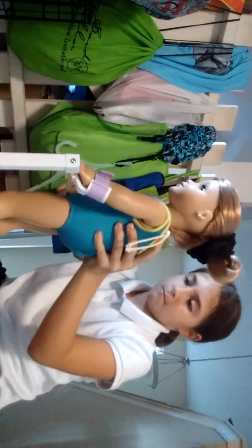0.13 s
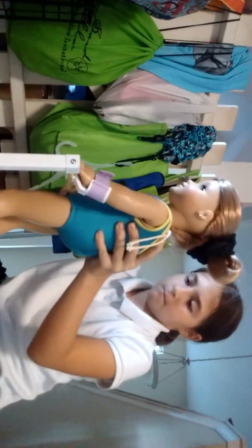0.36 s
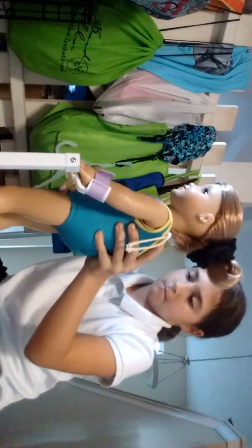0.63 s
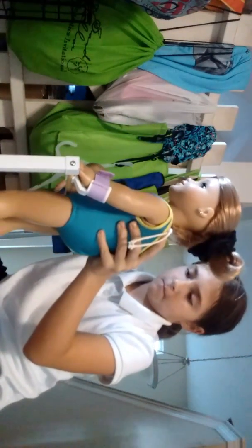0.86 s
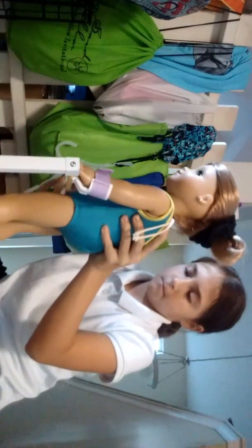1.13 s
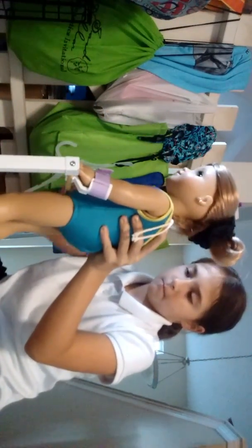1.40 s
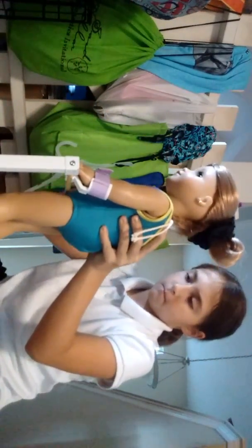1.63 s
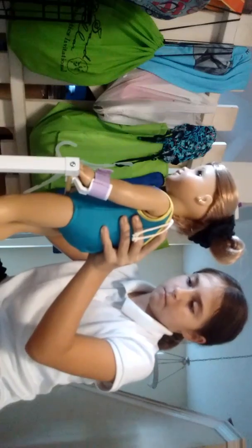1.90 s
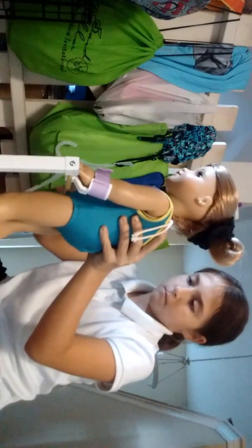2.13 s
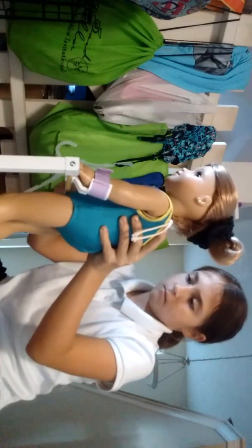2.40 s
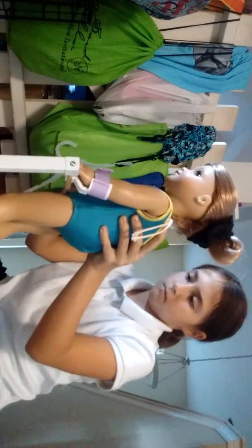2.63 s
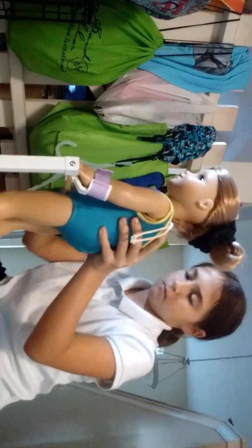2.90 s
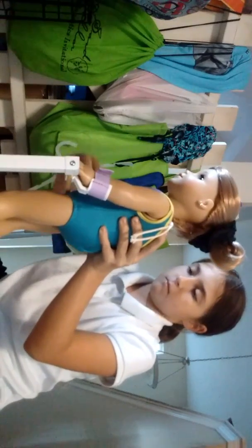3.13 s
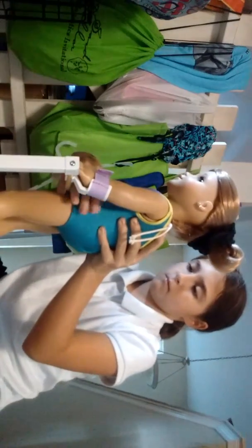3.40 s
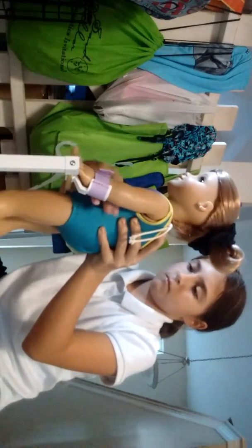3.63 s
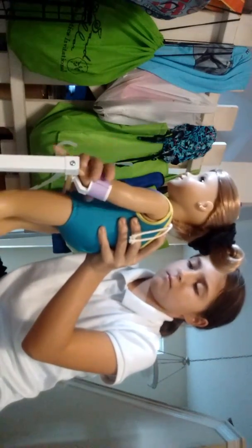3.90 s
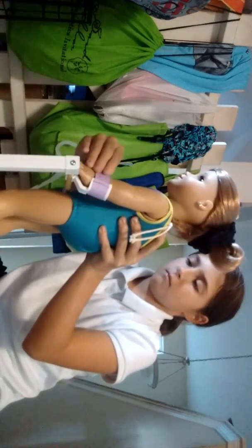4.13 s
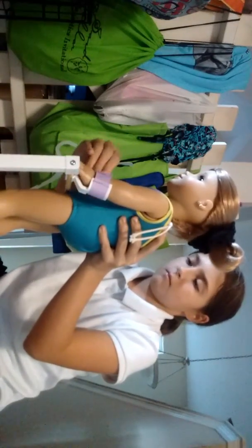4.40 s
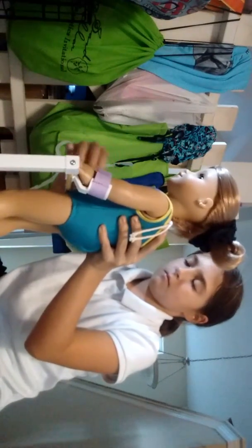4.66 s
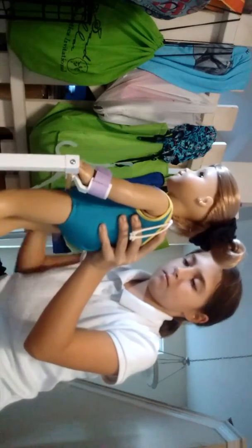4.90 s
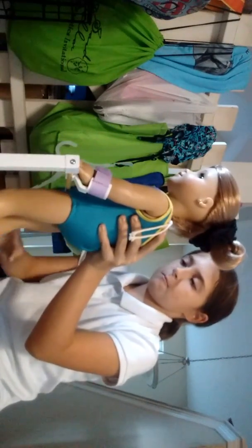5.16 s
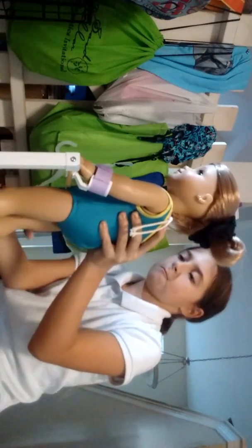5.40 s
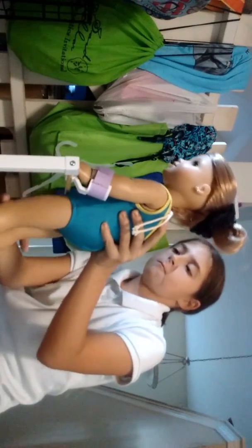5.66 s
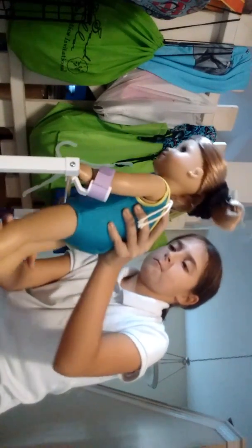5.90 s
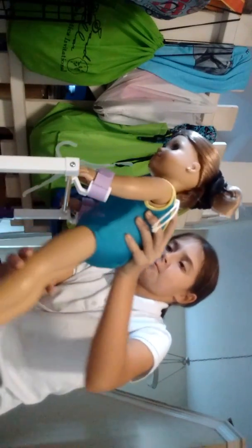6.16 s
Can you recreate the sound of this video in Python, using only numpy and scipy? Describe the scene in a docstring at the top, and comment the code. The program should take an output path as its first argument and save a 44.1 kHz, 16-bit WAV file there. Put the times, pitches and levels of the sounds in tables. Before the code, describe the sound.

A quiet small room with steady low ventilation hum, duct rumble and faint air hiss, miked close in stereo, the toy a little to the left. From 0.1 to 1.5 s, soft hollow plastic taps and faint brushing of hands on a toy bar, the firmest near 1.05 s, each with a faint ringing tail. At 1.8 s a wrist strap begins to crackle, loud and dense until about 2.0 s, thinning out to 2.25 s with one last strong snap. The background dips and slowly returns. Light taps follow, with firmer ones at 2.84 and 3.46 s. At 3.55 s crisp snaps lead to one very sharp, clean clasp click at 3.59 s, the loudest moment, then bright plastic crackles until 3.9 s. Near quiet until 4.8 s, then scattered soft rubs and hollow knocks, strongest around 5.7 s, ending by 5.95 s with only ventilation.

```python
"""A quiet room with ventilation: a small doll is fitted to plastic toy bars.
Wrist straps crackle, hands tap and rub the bar: mostly sharp blows and noise bursts through resonances;
taps add two ringing tones, the clasp one clean click. Hum lines and shaped noise make the ventilation;
room answer and ventilation sag at set moments and creep back.
Two microphone ports are cross-fed with a short delay, the right side inverted."""
import sys
import numpy as np
from scipy import signal
from scipy.fft import rfft, irfft, next_fast_len
from scipy.io import wavfile
from scipy.ndimage import uniform_filter1d

SR = 44100
rng = np.random.default_rng(int(sys.argv[2]) if len(sys.argv) > 2 else 0)


def linear_from_db(decibels):
    """Turn decibels (scalar or array-like) into linear amplitude factors; 0 gives 1."""
    return 10 ** (np.asarray(decibels, float) / 20)


def dump(signal):
    """Clip the signal to [-1, 1] and save it as 16-bit WAV at the path in sys.argv[1]."""
    limited = np.clip(np.atleast_2d(signal).T, -1, 1)
    pcm = np.round(limited * 32767).astype(np.int16)
    wavfile.write(sys.argv[1], SR, pcm)


N = 276948

# ventilation hum lines: f/Hz, level/dB
HUM_LINES = [(50.7, -51), (58.3, -39.5), (82.6, -54.5), (120, -50)]
# duct rumble spectrum, relative: f/Hz, level/dB per hertz
RUMBLE_SPECTRUM = [(15, -48), (28, -6), (45, -13.5), (66, -10), (92, -6.5), (118, -2.5), (135, -5.5),
                   (180, 4), (205, -6), (232, 0.5), (262, -8.5), (305, -11.5), (340, -12.5), (440, -16),
                   (490, -10), (545, -18.5), (610, -17.5), (750, -25), (1000, -55), (1600, -120)]
# air hiss spectrum, relative: f/Hz, level/dB per hertz
AIR_SPECTRUM = [(300, -120), (500, 0.5), (800, 0), (1150, 0.5), (1700, -7.5), (2400, -8.5), (3400, -10.5),
                (5000, -18.5), (6500, -22), (10000, -17), (15400, -19), (15900, -66)]
# likeness of the ventilation noise at the two ports: f/Hz, likeness (1 = identical)
PORT_LIKENESS = [(100, 1), (350, 0.69), (600, 0.63), (1200, 0), (2500, 0), (10000, 0)]
# sags of room answer and ventilation: t/s, depth/dB
SAGS = [(1.96, 1), (2.002, 6), (2.2, 4.5), (3.593, 15.5), (3.905, 13.5)]
# decay of the room's answer: f/Hz, t60/s
WALL_DECAY = [(500, 0.14), (3000, 0.58), (12000, 0.17)]
# toy's direct sound at the far port: f/Hz, level/dB
FAR_PORT_LEVEL = [(500, -27.5), (1000, -4), (2500, -4.5), (5000, -9.5), (8000, -1), (14000, -20)]
# scattered share at the far port: f/Hz, level/dB
SCATTER_LEVEL = [(500, -21), (1500, -3), (4000, -3.5), (10000, -5.5)]
# share each side takes from the other port: f/Hz, level/dB
CROSS_LEVEL = [(200, -3), (2000, -5.5), (8000, 2), (15000, -16.5)]
# rubbing strokes: start t/s, length/s, force level/dB, low body level/dB, high body level/dB
RUB_STROKES = [(0.345, 0.086, -47, 5.5, 3), (0.511, 0.062, -50.5, 10, -3), (1.846, 0.27, -48, 3.5, 11.5),
               (2.141, 0.045, -30.5, -1, -0.5), (2.175, 0.064, -26.5, 3.5, 7), (2.99, .05, -47, -1, -2.5),
               (3.193, 0.069, -44.5, -2.5, 2.5), (3.352, 0.043, -51.5, -3.5, 4.5),
               (3.457, 0.042, -48, -2, 4), (3.655, 0.08, -36, -7, -7.5), (3.808, 0.063, -48.5, 2, 8.5),
               (4.809, 0.052, -49.5, 5.5, -1), (5.106, 0.033, -44, 1, -4), (5.293, 0.044, -52, -9, -6.5),
               (5.684, 0.069, -47, 2, -5), (5.801, 0.091, -47, 4, -1)]
# rubbed strap cloth, low resonances: f/Hz, width/Hz, level/dB
CLOTH_MODES = [(1233, 310, 4.5), (2400, 1140, -1)]
# hand taps on the bar: t/s, force level/dB, hollow knock level/dB
BAR_TAPS = [(0.0832, -28.5, 13), (0.1996, -29, -2), (0.2025, -29, 8), (0.3535, -36, -8), (0.3905, -30, 8),
            (0.4099, -33, 10), (0.5142, -31, 2.5), (0.547, -30.5, 9), (0.654, -32, 3), (1.011, -33, -5),
            (1.053, -23, 4.5), (1.062, -30, 13.5), (1.2106, -32, 7.5), (1.507, -32.5, 5), (1.538, -31, 3.5),
            (2.358, -35, -15), (2.411, -30.5, -14), (2.8055, -34.5, 11.5), (2.838, -21, 1.5),
            (3.039, -32.5, -12), (3.308, -28.5, -14), (3.457, -19, 1), (4.0687, -41.5, -10),
            (4.138, -40.5, -11), (4.8109, -34.5, 7), (5.1172, -33, 5), (5.2121, -28.5, 10),
            (5.2803, -28.5, 12.5), (5.5276, -25.5, -0.5), (5.534, -29, 4), (5.5424, -28, 5.5),
            (5.6964, -25.5, -11), (5.704, -17.5, 3.5), (5.8071, -30, 4), (5.822, -22.5, 2.5),
            (5.8804, -26, 2), (5.8944, -34, -6), (5.926, -39, 0)]
# hollow knock of the bar: f/Hz, width/Hz, level/dB
KNOCK_MODES = [(864, 430, 2), (2060, 1220, -4)]
# the bar's wall, under taps and rubs: f/Hz, width/Hz, level/dB
SHELL_MODES = [(4390, 1370, 0.5)]
# the bar's long ring, a beating pair: f/Hz, t60/s
BAR_RING = [(2480, .33), (2535, .28)]
# strap snaps: t/s, force level/dB, brightness level/dB
STRAP_SNAPS = [(1.022, -25, -4.5), (1.812, -32.5, -4), (1.8316, -22.5, -5), (1.842, -12, -5),
               (1.8463, -2.5, -10.5), (1.8598, -6, -3), (1.8964, -7.5, -8.5), (1.926, -8, -2),
               (1.935, -19, 1), (1.9623, -2, -7), (1.9731, -3, -8), (1.978, -2.5, -5.5), (1.9943, -3.5, -5),
               (2.0033, -5, -4), (2.0347, -11, -4.5), (2.0505, -21, -1), (2.056, -19, -10),
               (2.0868, -17.5, -5.5), (2.1048, -16.5, -4.5), (2.1275, -28, 6), (2.1364, -12.5, -7),
               (2.1428, -11, -10.5), (2.1547, -15, 0), (2.165, -19, 4), (2.182, -16.5, -0.5),
               (2.2134, -7, -7.5), (2.2244, -24, 5), (3.547, -19, 8.5), (3.5537, -16.5, 3),
               (3.5588, -12.5, 3.5), (3.5894, -31, -9), (3.6436, -24.5, -3), (3.6571, -8.5, 3),
               (3.6591, -15, 6), (3.6644, -11, 0.5), (3.6776, -12, 3.5), (3.69, -20.5, 5),
               (3.695, -20.5, 2), (3.702, -17.5, 0), (3.717, -24, 12), (3.7506, -24, 7.5),
               (3.776, -22, 8.5), (3.7952, -23.5, 7), (3.8106, -27, 12.5), (3.8166, -16.5, 5),
               (3.8297, -24.5, 11.5), (3.8394, -27, 9), (3.8736, -12.5, 3.5), (3.905, -11, 1),
               (3.913, -14, -0.5)]
# how the strap is held from each moment on: start t/s, low body level/dB, spray t60/s
STRAP_GRIPS = [(0, -5, .008), (1.8, -17, 0.033), (2.08, -8.5, 0.025), (3.5, -5.5, 0.012)]
# the clasp clicking shut, a single row: t/s, force level/dB, low body level/dB, brightness level/dB
CLASP_CLICK = (3.5922, 14, -8, 2.5)
# plastic body under the strap, low group: f/Hz, width/Hz, level/dB
LOW_MODES = [(1380, 1200, -3), (2510, 1440, -1)]
# plastic body under the strap, middle group: f/Hz, width/Hz, level/dB
MIDDLE_MODES = [(4356, 295, 0)]
# plastic body, high group, shared by straps, taps and rubs: f/Hz, width/Hz, level/dB
HIGH_MODES = [(6350, 740, -3.5), (8680, 2760, -4.5), (9920, 1940, -2), (12740, 3600, -11.5)]
COLOUR_SCATTER_DB = 2.5  # no two snaps or taps excite the body alike


def unit(x):
    """Scales to rms 1."""
    return x / np.sqrt(np.mean(x ** 2) + 1e-20)


def along(points, hz):
    """Reads a curve of (Hz, value) points on a log frequency axis."""
    f, value = np.transpose(points)
    return np.interp(np.log(hz + 1), np.log(f + 1), value)


def filtered(x, response):
    """Applies a complex response of frequency."""
    size = next_fast_len(N + SR // 2)
    return irfft(rfft(x, size) * response(np.fft.rfftfreq(size, 1 / SR)), size)[..., :N]


def late(hz, ms):
    """Response of a pure delay: phase falls in proportion to frequency."""
    return np.exp(-2j * np.pi * hz * ms / 1000)


def pair(spectrum):
    """Noise of rms 1 at two ports: long waves reach both alike, short ones do not."""
    def mid_side(hz):
        angle = np.arccos(np.clip(along(PORT_LIKENESS, hz), -1, 1)) / 2
        return linear_from_db(along(spectrum, hz)) * np.array([np.cos(angle), np.sin(angle)])
    mid, side = filtered(rng.standard_normal((2, N)), mid_side)
    return unit(np.array([mid + side, mid - side]))


def ventilation():
    """Steady hum lines as sines, duct rumble and air hiss as shaped noise."""
    t = np.arange(N) / SR
    hum = np.zeros(N)
    for hz, db in HUM_LINES:
        hum += linear_from_db(db) * np.sqrt(2) * np.sin(2 * np.pi * (hz * t + rng.random()))
    rumble = linear_from_db(-41.5) * pair(RUMBLE_SPECTRUM)
    air = linear_from_db(-54) * pair(AIR_SPECTRUM)
    return hum + rumble + air


def sag():
    """The level drops at once at each listed moment and returns at a steady pace; the deepest sag wins."""
    t, back_db_per_s = np.arange(N) / SR, 10.5
    sags = [np.where(t > s, db - back_db_per_s * (t - s), 0).clip(0) for s, db in SAGS]
    return linear_from_db(-uniform_filter1d(np.max(sags, axis=0), size=300))


def walls(x):
    """The room's answer: decaying noise, unrelated at the two ports, renewed every tenth of a second."""
    out, step = np.zeros((2, N + SR)), SR // 10
    for start in range(0, N, step):
        hz, t, grains = signal.stft(rng.standard_normal((2, SR // 3)), SR, nperseg=256)
        fade = linear_from_db(-60 * t / along(WALL_DECAY, hz)[:, None])
        tail = signal.istft(grains * fade, SR, nperseg=256)[1]
        tail = tail / np.linalg.norm(tail[0])
        wet = signal.fftconvolve(x[None, start:start + step], tail, axes=1)
        out[:, start + 130:][:, :wet.shape[1]] += wet  # about 3 ms behind the toy
    return out[:, :N]


def scattered(x, t60):
    """Sound bounced off moving hands and doll: a brief smear, renewed every fiftieth of a second."""
    step = SR // 50
    out, t = np.zeros(N + SR), np.arange(step) / SR
    for start in range(0, N, step):
        smear = rng.standard_normal(step) * linear_from_db(-60 * t / t60)
        piece = np.resize(x[start:start + step], step)
        out[start:][:2 * step - 1] += signal.fftconvolve(piece, smear / np.linalg.norm(smear))
    return out[:N]


def resonant(x, modes):
    """Sums band-pass resonances of alternating sign."""
    def response(f):
        total = 0
        for k, (centre, width, db) in enumerate(modes):
            damping = 1j * f * width
            total = total + (-1) ** k * linear_from_db(db) * damping / (centre ** 2 - f ** 2 + damping)
        return total
    return filtered(x, response)


def body(force, low, middle, floor_hz):
    """Plastic turns force into sound; a small object radiates little bass and a soft contact little top."""
    sound = resonant(force[0], low) + resonant(force[1], middle) - resonant(force[2], HIGH_MODES)
    band = signal.butter(3, [floor_hz, 14500], "bandpass", fs=SR, output="sos")
    return signal.sosfilt(band, sound)


def add(force, s, burst, db, low_db, high_db):
    """One contact drives the low, middle and high groups of resonances."""
    part = force[:, round(s * SR):][:, :len(burst)]
    group_db = db + np.array([[low_db], [0], [high_db]])
    part += linear_from_db(group_db) * burst[:part.shape[1]]


def crackle(size, spread_db):
    """Noise whose samples differ widely in strength, like many tiny slips."""
    return unit(rng.standard_normal(size) * linear_from_db(spread_db * rng.standard_normal(size)))


def blow(t60, spike, spray, spread_db):
    """A sharp one-sample blow with a dying spray of slips."""
    t = np.arange(SR // 3) / SR
    return spike * (t == 0) + spray * crackle(len(t), spread_db) * linear_from_db(-60 * t / t60)


def rubs():
    """Rubbing strokes: crackle that swells and fades, coloured by cloth and the bar's wall."""
    force = np.zeros((3, N))
    for s, length, db, low_db, high_db in RUB_STROKES:
        swell = np.sin(np.linspace(0, np.pi, round(length * SR))) ** 0.36
        slips = crackle(SR // 2, spread_db=5.5)[:len(swell)]
        add(force, s, swell * slips, db, low_db, high_db)
    return body(force, CLOTH_MODES, SHELL_MODES, floor_hz=944)


def taps():
    """Hands strike the hollow bar: each blow knocks it, its spray dying in the same time."""
    force = np.zeros((3, N))
    for s, db, knock_db in BAR_TAPS:
        bright_db = -1.5 + COLOUR_SCATTER_DB * rng.normal()
        burst = blow(t60=0.042, spike=3.04, spray=0.43, spread_db=7.0)
        add(force, s, burst, db, knock_db, bright_db)
    return body(force, KNOCK_MODES, SHELL_MODES, floor_hz=557)


def bar_ring():
    """Every tap also sets off two close, slowly dying tones that beat."""
    ring, t = np.zeros(N + SR), np.arange(SR // 3) / SR
    ring_db = -32  # relative to the tap's force
    for s, db, _ in BAR_TAPS:
        for hz, t60 in BAR_RING:
            tone = np.sin(2 * np.pi * (hz * t + rng.random()))
            ring[round(s * SR):][:len(t)] += linear_from_db(db + ring_db - 60 * t / t60) * tone
    return ring[:N]


def straps():
    """Strap snaps take low body and spray length from the grip; the clasp clicks as one clean blow."""
    force = np.zeros((3, N))
    for s, db, bright_db in STRAP_SNAPS:
        _, low_db, t60 = max(grip for grip in STRAP_GRIPS if grip[0] < s)  # latest grip
        low_db = low_db + COLOUR_SCATTER_DB * rng.normal()
        burst = blow(t60, spike=2.4, spray=0.63, spread_db=6.5)
        add(force, s, burst, db, low_db, bright_db)
    s, db, low_db, bright_db = CLASP_CLICK
    add(force, s, np.ones(1), db, low_db, bright_db)
    return body(force, LOW_MODES, MIDDLE_MODES, floor_hz=1010)


def toy():
    """All contacts of doll and bar, close up."""
    return rubs() + taps() + bar_ring() + straps()


def scene():
    """The toy is nearer the left port; the right one gets it slightly later, partly scattered."""
    near = toy()
    direct = filtered(near, lambda hz: linear_from_db(along(FAR_PORT_LEVEL, hz)) * late(hz, ms=0.078))
    bounced = filtered(scattered(near, t60=0.0042), lambda hz: linear_from_db(along(SCATTER_LEVEL, hz)))
    room = linear_from_db(-12.5) * walls(near) + ventilation()
    return np.array([near, direct + bounced]) + sag() * room


def band_limit(x):
    """A steep low-pass at the top of the band."""
    return signal.sosfilt(signal.butter(12, 16670, fs=SR, output="sos"), x)


def record(dry):
    """Ports add faint hiss; each side gets a delayed share of the other; the right is inverted and weaker."""
    hiss = linear_from_db(-74.0) * filtered(rng.standard_normal((2, N)), lambda hz: hz < 15600)
    ports = dry + hiss
    cross = filtered(ports[::-1], lambda hz: linear_from_db(along(CROSS_LEVEL, hz)) * [late(hz, ms=0.298), late(hz, ms=0.3343)])
    side_gain = linear_from_db([[1.1], [-1.1]]) * [[1], [-1]]
    return band_limit((ports + cross) * side_gain)


dry = scene()
out = record(dry)
dump(out)
```